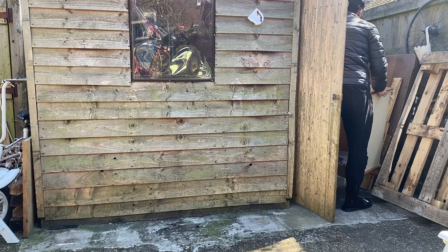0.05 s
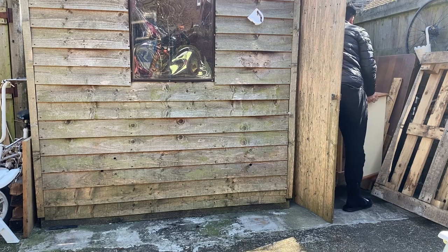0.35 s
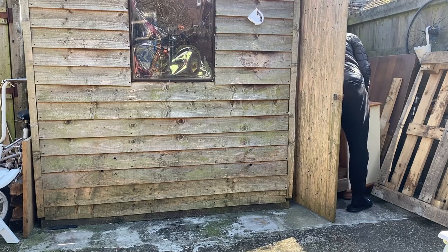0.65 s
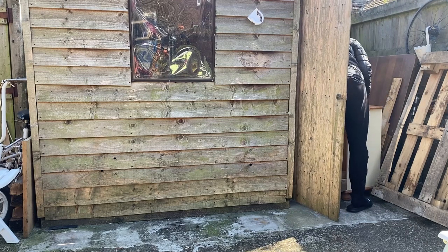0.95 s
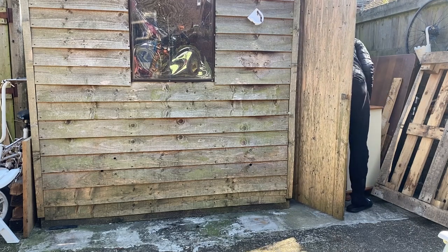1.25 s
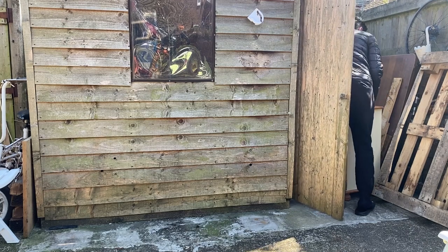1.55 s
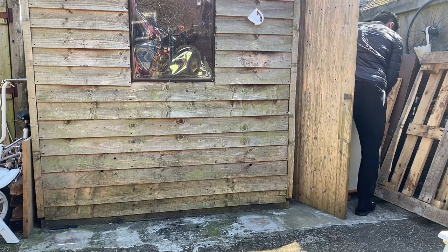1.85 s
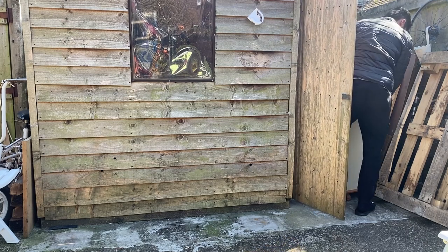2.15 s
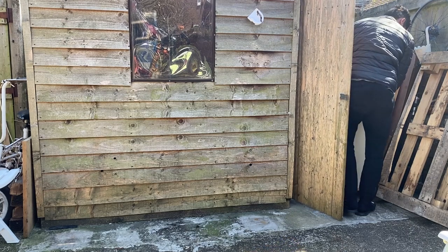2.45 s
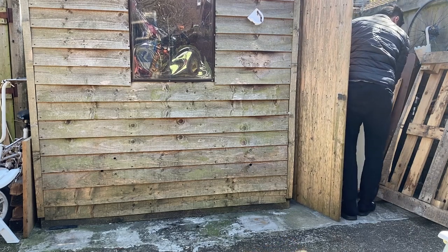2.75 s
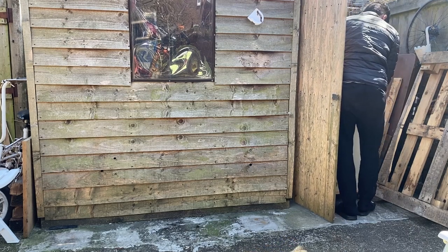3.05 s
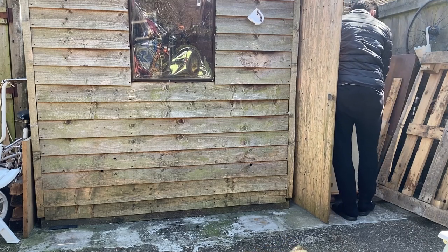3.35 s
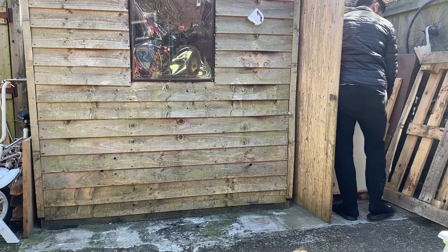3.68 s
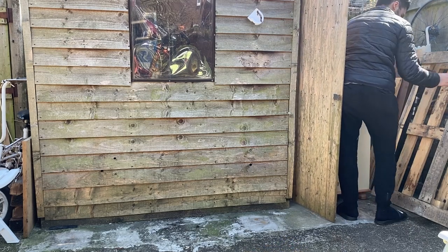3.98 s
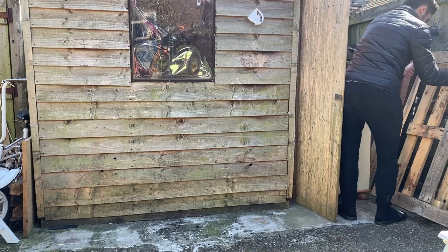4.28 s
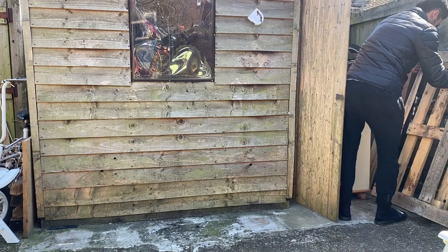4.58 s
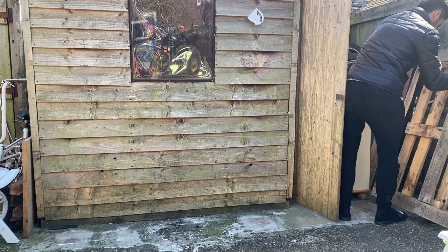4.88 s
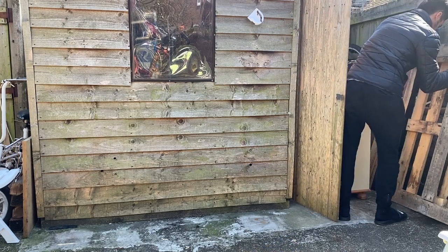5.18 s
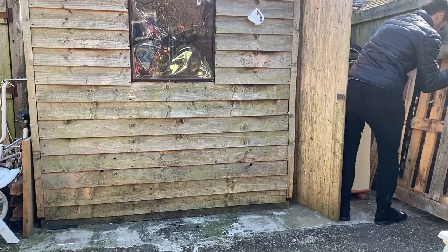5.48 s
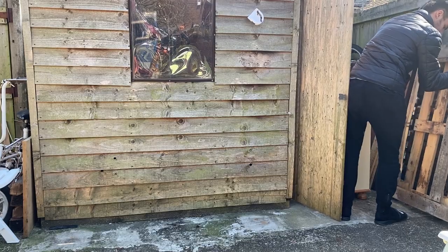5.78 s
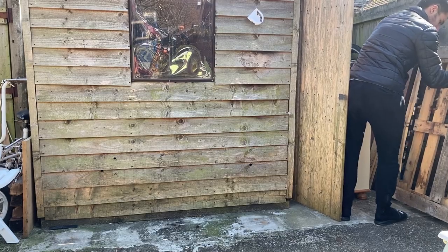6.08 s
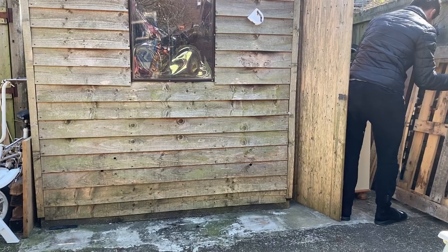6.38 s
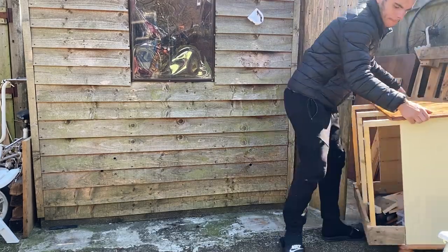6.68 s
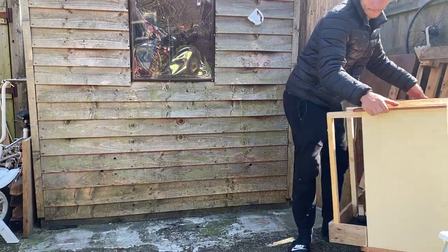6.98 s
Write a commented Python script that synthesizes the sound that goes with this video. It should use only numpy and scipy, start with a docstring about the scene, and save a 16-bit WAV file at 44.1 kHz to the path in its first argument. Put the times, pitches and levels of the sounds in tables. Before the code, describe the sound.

A wooden cabinet knocks, booms and scrapes as it is worked loose outdoors, with jacket rustle and wind buffeting the microphone.

```python
"""First a padded jacket rustles and loose slats tap, while light wind rumbles on the microphone.
A wooden cabinet is being worked out from between a shed and a stack of pallets in a small yard.
Its frame knocks and rasps against them, and its thin panels boom when it bumps. Dull thuds
and a faint, far whine come in between. Near the end its feet catch on gritty concrete,
and a gust buffets the microphone as it is carried off."""
import sys
import numpy as np
from scipy import signal
from scipy.fft import rfft, irfft, next_fast_len
from scipy.io import wavfile

SR = 44100
rng = np.random.default_rng(int(sys.argv[2]) if len(sys.argv) > 2 else 0)


def dump(signal):
    """Clip the signal to [-1, 1] and save it as 16-bit WAV at the path in sys.argv[1]."""
    limited = np.clip(np.atleast_2d(signal).T, -1, 1)
    pcm = np.round(limited * 32767).astype(np.int16)
    wavfile.write(sys.argv[1], SR, pcm)


N = 314433

# Levels in dB set the balance within a table; the functions add their own gains.
# The tone of each noise. Each row: frequency in Hz, level in dB.
YARD_COLOUR = [(25, -10.5), (60, -2), (120, -4), (340, -8), (950, -16), (1900, -27), (3000, -34),
               (7400, -46.5), (11500, -42.5), (15000, -66)]
WIND_COLOUR = [(25, -19.5), (45, 6), (65, 4), (95, 1.5), (150, -9), (700, -69)]
GUST_COLOUR = [(30, -9), (65, 7.5), (230, 1.5), (430, -9.5), (800, -32)]
JACKET_COLOUR = [(550, 9.5), (1300, 5.5), (3500, 0), (7200, -2.5), (12000, -8.5), (16000, -17)]
CRUNCH_COLOUR = [(400, 16), (1300, 1.5), (2400, 2), (4500, -24), (12000, -9)]   # grit under dragged wood

# Sounds that swell and fade. Each row: time of the peak in seconds, level in dB, length in seconds.
WIND_SWELLS = [(1.45, -43.5, 0.42), (5.22, -34, 0.25), (6.6, -44, 0.88)]
SWISHES = [(0.163, -50.5, 0.014), (0.42, -66, 0.68), (0.74, -59.5, 0.044), (1.47, -58.5, 0.088),
           (1.581, -57, 0.019), (1.7, -70, 0.43), (1.808, -62.5, 0.025), (3.518, -63.5, 0.034),
           (3.856, -71, 0.083), (4.42, -69.5, 0.18), (5.075, -65.5, 0.05), (6.084, -63, 0.038),
           (6.76, -60.5, 0.21)]   # sleeves and soles brush past
DRAGS = [(1.61, -54, 0.18), (3.118, -40.5, 0.029), (4.08, -70.5, 0.23), (5.57, -44, 0.12),
         (5.99, -43.5, 0.14), (6.73, -45.5, 0.063)]   # the frame rasps along shed and pallets
WHINE_SWELLS = [(3.95, -77.5, 0.53)]
# A gust hits. Each row: time of the peak in seconds, level in dB, length in seconds, top pitch in Hz.
BUFFETS = [(6.977, -25, 0.03, 304), (7.021, -19.5, 0.03, 480), (7.15, -18.5, 0.11, 560)]

# Loose slats tap. Each row: start in seconds, level in dB, brightest frequency in Hz.
TAPS = [(0.168, -41.5, 3670), (0.205, -33, 2180), (0.358, -29.5, 2680), (1.76, -43.5, 2050),
        (2.402, -39, 900), (2.665, -46, 1420), (3.247, -45, 2980), (3.324, -52.5, 3200),
        (3.382, -51.5, 3250), (4.022, -42, 1180), (4.197, -29.5, 1290), (4.261, -36.5, 1310),
        (5.025, -39.5, 1050)]
# The frame knocks. Each row: start in seconds, clack in dB, low body in dB relative to the clack,
# frequency in Hz that the struck spot favours.
KNOCKS = [(0.227, -44, -8.5, 420), (0.833, -29.5, -7, 740), (1.415, -50.5, 1, 730), (5.245, -28, -15, 1170),
          (5.374, -40.5, -8.5, 1420), (5.451, -21, -16, 3220), (5.489, -29, -17.5, 840),
          (5.551, -30.5, -17, 563), (5.594, -32.5, -15.5, 810), (5.637, -31.5, -12.5, 604),
          (5.743, -21.5, -9.5, 550), (5.842, -31.5, -14, 890), (5.947, -33, -13, 720),
          (5.963, -35, -13, 593), (6.695, -33.5, -9.5, 1440)]
# The cabinet bumps and rebounds. Each row: start in seconds, force in dB, hardness in dB,
# panel boom and frame ring (both in dB relative to the force), seconds of free swing.
BUMPS = [(0.832, -12.5, -4, 2, -4, 0.24), (0.9, -18.5, 5.5, -17, -7.5, 0.05),
         (0.97, -21.5, -1.5, 2, -3.5, 0.049), (1.011, -28.5, 4.5, -33, -5.5, 0.04),
         (2.663, -20.5, -17, -2.5, -4.5, 0.1), (2.786, -24, -11.5, 1.5, -5, 0.059),
         (2.974, -28.5, -22, 0, -1.5, 0.06), (2.997, -36, -3.5, -18, 1, 0.05),
         (3.052, -20.5, -3.5, -3, -1, 0.03), (3.101, -27, -0.5, -9.5, -9.5, 0.062)]
# Dull thuds; the last two are the gust buffeting the microphone. Each row: start in seconds, level in dB, the
# pitch it sinks to in Hz.
THUDS = [(1.506, -25.5, 203), (1.659, -24, 70.4), (2.197, -33, 63), (4.513, -33, 63), (5.118, -18.5, 63.4),
         (5.351, -21.5, 71), (5.665, -24, 147), (5.746, -13.5, 150), (6.038, -24.5, 62),
         (6.669, -20.5, 59.6), (6.966, -13, 115), (7.021, -7.5, 163)]
# A foot catches on grit. Each row: start in seconds, level in dB.
SCRAPES = [(5.549, -24.5), (5.607, -29.5), (5.685, -40.5), (5.847, -26), (5.936, -29.5), (5.946, -24.5),
           (5.953, -27), (5.996, -32.5), (6.026, -21), (6.71, -22.5), (6.769, -27.5), (6.814, -36.5),
           (6.881, -33.5)]

# Modes are the tones a part rings with when struck.
# Each row: pitch in Hz, level in dB, seconds to fade by 60 dB (called t60).
SLAT_MODES = [(588, 0.5, 0.13), (1225, 1, 0.074), (1437, 1, 0.05), (2820, -4.5, 0.012), (4740, 5.5, 0.025)]
BATTEN_MODES = [(325, -5.5, 0.18), (441, 5, 0.035), (559, -1.5, 0.047), (727.5, 2, 0.055),
                (824, 0.5, 0.055), (986, -0.5, 0.047), (1128, -2.5, 0.055), (1358, -6, 0.073),
                (1540, -5.5, 0.063), (1760, -5, 0.098), (2350, -7.5, 0.14)]   # battens are narrow strips of wood
FRAME_MODES = [(213, 1, 0.29), (255.8, -2, 0.35), (297.2, 5.5, 0.23), (322, 0, 0.21), (377.6, -6.5, 0.21)]
PANEL_MODES = [(62, -8, 0.5), (117.8, 9.5, 0.35), (153, -1.5, 0.42)]
WALL_MODES = [(471, -2, 0.28), (540, -1.5, 0.15), (638, -5.5, 0.35), (857, -16, 0.37), (959, -2, 0.12),
              (1172, -7, 0.25), (1350, -36, 0.06)]
# The bright tones of a scraping foot. Each row: pitch in Hz, width in Hz, level in dB.
FOOT_RESONANCES = [(2300, 600, 2.5), (3750, 450, 6.5), (4500, 400, 6), (7100, 1000, -1),
                   (11300, 1600, -3.5)]

# How alike left and right are. Each row: frequency in Hz, likeness (held between 0 and 1 when used).
LIKENESS = [(100, 0.78), (280, 0.72), (600, -0.8), (1300, 0), (2500, -0.58), (6000, 1), (12000, -3.26)]
# The microphone's housing shades its sides. Each row: frequency in Hz, left minus right in dB.
SHADING = [(60, -0.3), (250, -1.5), (600, -1), (1300, -3), (2300, 5), (4500, 2.5), (12000, 0)]
# How loud a bump's clatter and crack are. Each: base in dB, dB per dB of force, dB per dB of hardness.
CLATTER_LAW, CRACK_LAW = (-15, 1, 0.28), (-33.5, 0.89, 0.74)

EDGES = 22 * 2 ** np.arange(0, 9.6, .5)   # borders of half-octave bands, in Hz
CENTRES = np.sqrt(EDGES[1:] * EDGES[:-1])
BAND_FILTERS = [signal.butter(2, edge, "band", fs=SR, output="sos") for edge in zip(EDGES, EDGES[1:])]
AGE = np.arange(SR * 2 // 3) / SR   # seconds since a hit


def from_db(db):
    """Turn decibels into a gain to multiply by."""
    return 10 ** (np.asarray(db) / 20)


def rms_one(x):
    """Scale a signal so its average strength (rms) is 1."""
    return x / np.sqrt(np.mean(x ** 2) + 1e-20)


def at_hz(points, hz):
    """Read between the rows of a table, spacing frequencies by octaves."""
    f, value = np.transpose(points)
    return np.interp(np.log(hz), np.log(f), value)


def add(out, s, sound):
    """Mix a sound in, starting at s seconds."""
    start = max(round(s * SR), 0)
    out[..., start:start + sound.shape[-1]] += sound[..., :N - start]


def drift(rate, size):
    """Glide between random values, rate times a second."""
    knots = rng.standard_normal(SR)
    return np.interp(np.arange(size) * rate / SR, np.arange(SR), knots)


def clicks(rate, size):
    """Clicks of random strength, about rate of them a second."""
    return (rng.random(size) < rate / SR) * rng.standard_normal(size)


def swells(rows):
    """A loudness curve made of overlapping rises and falls."""
    t = np.arange(N) / SR
    return np.sqrt(sum(from_db(2 * db) * np.exp(-(2 * (t - s) / length) ** 2) for s, db, length in rows))


def bands(size, diffuse=1):
    """One stereo noise for each band; a higher diffuse makes left and right less alike."""
    white, out = rng.standard_normal((2, 2, size + SR // 10)), []
    for k, sos in enumerate(BAND_FILTERS):
        mid, side = signal.sosfilt(sos, white[k % 2])[:, -size:]
        alike = np.clip(at_hz(LIKENESS, CENTRES[k]), 0, 1) ** diffuse
        out.append(rms_one(np.sqrt(1 + alike) * mid + np.sqrt(1 - alike) * side * [[1], [-1]]))
    return np.array(out)


def noise(colour, diffuse=1):
    """Steady stereo noise with the given tone."""
    gains = from_db(at_hz(colour, CENTRES)) * np.sqrt(CENTRES)
    return rms_one(np.tensordot(gains, bands(N, diffuse), 1))


def weighted(modes, colour):
    """A contact wakes some modes more than others."""
    return [(hz, db + at_hz(colour, hz), t60) for hz, db, t60 in modes]


def ring(modes, bloom_cycles, spread_db, detune):
    """Tones swell as bending waves fill the board, then fade; each blow varies their level and pitch."""
    out = 0
    for (hz, db, t60), (size, shift) in zip(modes, rng.standard_normal((len(modes), 2))):
        cycles = AGE * hz * (1 + detune * shift)
        swell = 1 - np.exp(-(cycles / bloom_cycles) ** 2)
        out = out + from_db(db + spread_db * size - 60 * AGE / t60) * swell * np.sin(2 * np.pi * cycles)
    return out


def clatter(colour, t60, damping, tail_db, tail_t60, rise_cycles):
    """Crowded modes blur into noise whose highs die first; fence and shed return a weak echo."""
    hz = CENTRES[:, None]
    decay = from_db(-60 * AGE / (t60 * (1000 / hz) ** damping))
    shape = from_db(at_hz(colour, hz)) * (1 - np.exp(-AGE * hz / rise_cycles))
    direct = np.sum(shape * decay * bands(len(AGE))[:, 0], axis=0)
    echoes = from_db(3) * decay + from_db(tail_db - 60 * AGE / tail_t60)   # nearest boards, then the tail
    return direct + np.einsum("bt,bct->ct", shape * echoes, bands(len(AGE)))


def air(breeze_db=-55, yard_db=-57.5):
    """A distant outdoor hum, uneven wind on the microphone, and buffets that each reach a higher pitch."""
    strength = np.hypot(from_db(breeze_db), swells(WIND_SWELLS))
    wind = strength * from_db(4.8 * drift(23, N)) * noise(WIND_COLOUR)
    eddies = noise(GUST_COLOUR)
    for s, db, length, top_hz in BUFFETS:
        lowpass = signal.butter(4, top_hz, fs=SR, output="sos")
        wind = wind + signal.sosfilt(lowpass, eddies * swells([(s, db, length)]))
    return from_db(yard_db) * noise(YARD_COLOUR, diffuse=1.5) + wind


def jacket():
    """Nylon rubs in uneven little crinkles."""
    crinkles = from_db(6 + 3.4 * drift(45, N) + 2.2 * drift(490, N))
    return swells(SWISHES) * crinkles * noise(JACKET_COLOUR, diffuse=5)


def taps(snap_delay_s=0.0043, snap_db=-3.5):
    """Light slats touch, then snap into place; a shorter contact sounds brighter."""
    out = np.zeros((2, N))
    for s, db, hz in TAPS:
        contact = [(hz / 10, -18), (hz / 2, -7), (hz, 0), (hz * 2, -10), (hz * 10, -32)]
        slat = ring(weighted(SLAT_MODES, contact), bloom_cycles=0.77, spread_db=6, detune=0.0019)
        touch = clatter(contact, t60=0.019, damping=0.13, tail_db=-6, tail_t60=0.14, rise_cycles=2.8)
        snap = from_db(snap_db) * np.sin(2 * np.pi * AGE * hz) * np.exp(-AGE * hz / 1.1)
        add(out, s, from_db(db - 9) * touch)
        add(out, s + snap_delay_s, from_db(db) * (from_db(-14) * slat + snap))
    return out


def knocks():
    """Wood hits wood: a hard first blow, then a faint run of slips while the battens ring."""
    out = np.zeros((2, N))
    for s, clack_db, weight_db, spot_hz in KNOCKS:
        body_db, crack_db = clack_db + weight_db, clack_db - 15.5
        slips = clicks(350, len(AGE)) * from_db(-8.5 - 60 * AGE / 0.097)
        slips[0] = 1   # the first blow
        spot = [(spot_hz / np.sqrt(2), -4), (spot_hz, 6), (spot_hz * np.sqrt(2), -4)]
        batten = ring(weighted(BATTEN_MODES, spot), bloom_cycles=0.93, spread_db=3.5, detune=0.014)
        batten = signal.fftconvolve(batten, slips / np.linalg.norm(slips))[:len(AGE)]
        colour = [(30, body_db - 22), (70, body_db - 15.5), (170, body_db), (420, body_db - 1),
                  (700, clack_db - 13), (1300, clack_db - 14.5),
                  (2600, crack_db - 6), (6000, crack_db - 8.5), (15000, crack_db - 18)]
        wood = clatter(colour, t60=0.12, damping=0.38, tail_db=-10, tail_t60=0.49, rise_cycles=0.94)
        bite = 1 - np.exp(-AGE / 0.0079)   # the contact takes a moment to grip
        flicker = from_db(0.76 + 1.8 * drift(500, len(AGE)))
        add(out, s, from_db(clack_db - 0.5) * batten + wood * bite * flicker)
    return out


def bumps(resting_db=-3):
    """The frame sounds first, then the panels boom; hollow walls ring and loose joints buzz."""
    out = np.zeros((2, N))
    for s, force_db, hard_db, boom_db, body_db, free_s in BUMPS:
        clatter_db, crack_db = np.dot([CLATTER_LAW, CRACK_LAW], [1, force_db, hard_db])
        frame_db, panel_db = force_db + body_db, force_db + boom_db
        settle = from_db(resting_db * (1 - np.exp(-(AGE / free_s) ** 4)))   # quieter once it rests
        frame = from_db(frame_db) * ring(FRAME_MODES, bloom_cycles=2.34, spread_db=1.5, detune=0.026)
        panel = from_db(panel_db) * ring(PANEL_MODES, bloom_cycles=2.8, spread_db=0.5, detune=0.007)
        colour = [(30, frame_db - 42.5), (70, frame_db - 7), (250, frame_db - 11),
                  (480, clatter_db - 6), (1200, clatter_db - 8.5),
                  (2800, crack_db - 1), (7000, crack_db - 6.5), (15000, crack_db - 11)]
        joints = clatter(colour, t60=0.3, damping=0.22, tail_db=-11.5, tail_t60=0.68, rise_cycles=0.96)
        swing = panel / np.abs(panel).max()
        buzz = from_db(1.7 * swing + 1.76 * drift(220, len(AGE)))
        walls = from_db(clatter_db) * ring(WALL_MODES, bloom_cycles=4.3, spread_db=1.5, detune=0.015)
        press = 1 - np.exp(-AGE / 0.0044)   # the heavy cabinet leans into the contact
        add(out, s, (frame + panel) * settle + walls + joints * buzz * press)
    return out


def thuds():
    """Soft pushes, by hand or gust, that swing only a few times, sinking in pitch."""
    out = np.zeros(N)
    for s, db, hz in THUDS:
        cycles = AGE * hz
        swing = np.sin(2 * np.pi * (cycles + .5 * (1 - np.exp(-cycles))))
        progress = cycles / 0.9
        add(out, s, from_db(db - 7) * swing * progress * np.exp(1 - progress))
    return out


def drags():
    """Rough sawn wood sticks and slips at random: grit crunches and the battens keep ringing."""
    slips = clicks(900, N) * from_db(1.74 * drift(110, N))
    batten = ring(BATTEN_MODES, bloom_cycles=0.5, spread_db=1, detune=0.027)
    batten = batten * from_db(-60 * AGE / 0.03)   # the load cuts the ring short
    grit = clatter(CRUNCH_COLOUR, t60=0.00085, damping=0.2, tail_db=-21, tail_t60=0.012, rise_cycles=0.17)
    contact = batten / np.linalg.norm(batten) + from_db(2.5) * grit / np.linalg.norm(grit[0])
    rubbing = rms_one(slips) * swells(DRAGS)
    return signal.fftconvolve(rubbing[None], contact, axes=1)[:, :N]


def whine(pitch_hz=1870):
    """A thin tone wavers somewhere beyond the fence."""
    hz = pitch_hz + 35 * drift(23, N)
    return swells(WHINE_SWELLS) * np.sin(2 * np.pi * np.cumsum(hz) / SR)


def scrapes(catch_s=0.0057):
    """A foot catches on grit in a burst of tiny slips; its bright tones shift a little each time."""
    out = np.zeros(N)
    for s, db in SCRAPES:
        progress = AGE / (catch_s / 2)
        pressure = progress ** 2 * np.exp(2 - 2 * progress)
        slips = rms_one(clicks(2200, len(AGE)) * pressure) * np.sqrt(np.mean(pressure ** 2)) + 1e-18
        for k, (hz, width, mode_db) in enumerate(FOOT_RESONANCES):
            shifted_hz, weight_db = rng.normal([hz, mode_db], [.03 * hz, 2])
            tone = signal.lfilter(*signal.iirpeak(shifted_hz, hz / width, fs=SR), slips)
            add(out, s, (-1) ** k * from_db(db + weight_db - 5.5) * tone)
    echo = rng.standard_normal((2, len(AGE))) * from_db(-60 * AGE / 0.079)
    echo /= np.linalg.norm(echo[0])
    return out + from_db(-1.5) * signal.fftconvolve(out[None], echo, axes=1)[:, :N]


def from_the_right(x, lag_ms):
    """Sound from the right reaches the left side later, and the housing shades the sides unequally."""
    size = next_fast_len(N + SR // 10)
    hz = np.arange(size // 2 + 1) * SR / size
    shade = from_db(at_hz(SHADING, hz + 1) / 2)
    delay = np.exp(-2j * np.pi * hz * lag_ms / 1000)
    return irfft(rfft(x, size) * [shade * delay, 1 / shade], size)[:, :N]


def scene():
    """Slats and jacket are nearly straight ahead, the shed to the right, the pallets further right."""
    ahead = from_the_right(taps() + jacket(), lag_ms=0.055)
    by_shed = from_the_right(bumps(), lag_ms=0.15)
    by_pallets = from_the_right(knocks() + drags() + scrapes(), lag_ms=0.212)
    return ahead + by_shed + by_pallets + thuds() + air() + whine()


def record(dry):
    """Cut the rumble below 32 Hz and the treble above 16000 Hz."""
    dry = signal.sosfilt(signal.butter(2, 32, "highpass", fs=SR, output="sos"), dry)
    return signal.sosfilt(signal.ellip(10, .1, 80, 16000, fs=SR, output="sos"), dry)


dry = scene()
out = record(dry)
dump(out)
```